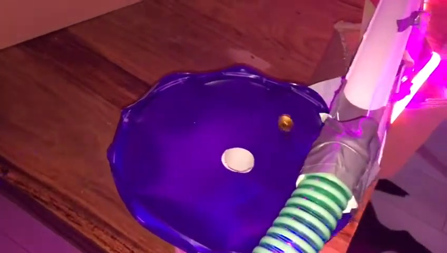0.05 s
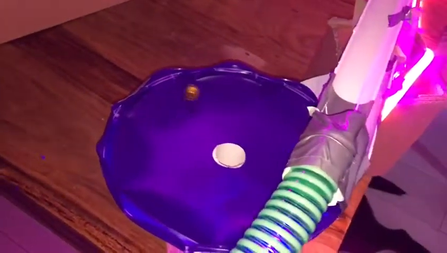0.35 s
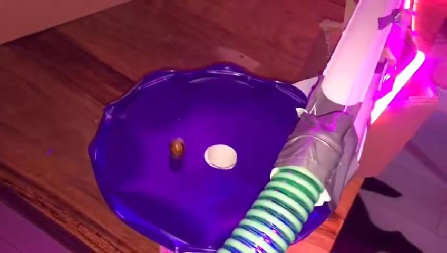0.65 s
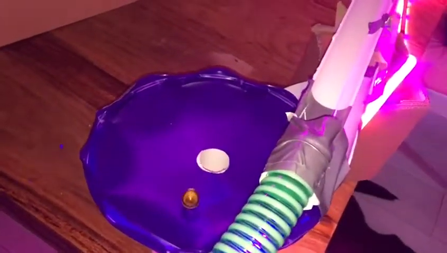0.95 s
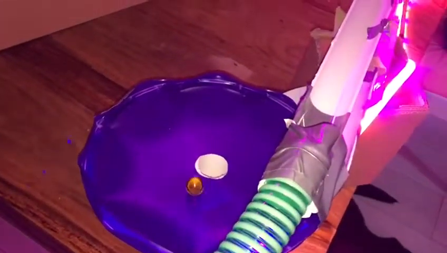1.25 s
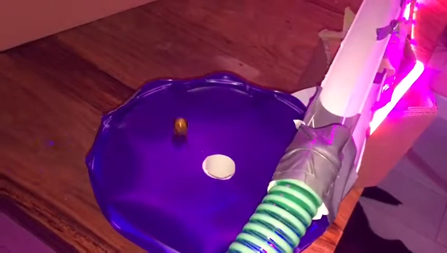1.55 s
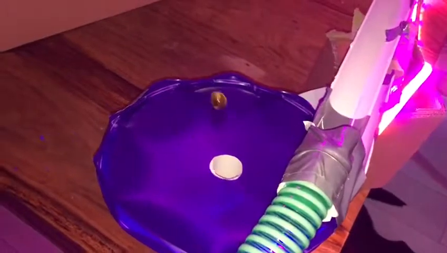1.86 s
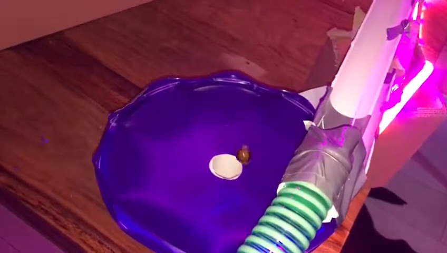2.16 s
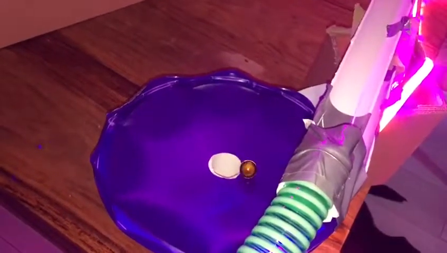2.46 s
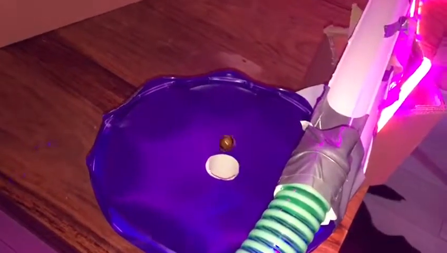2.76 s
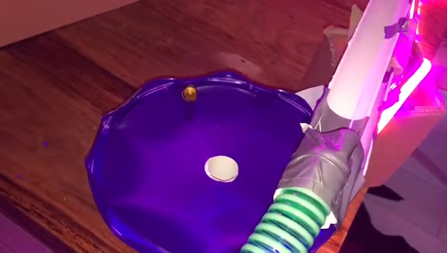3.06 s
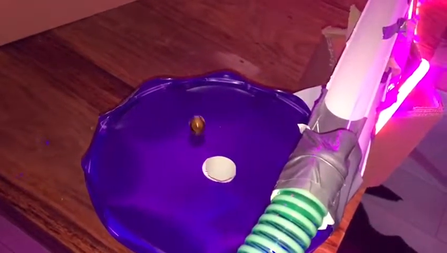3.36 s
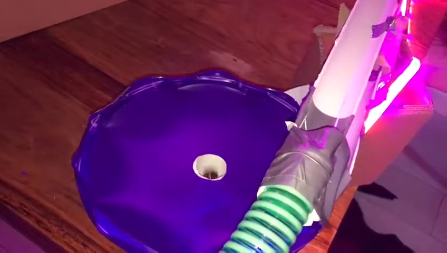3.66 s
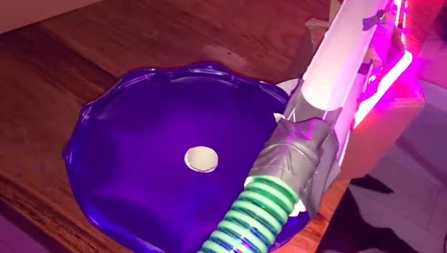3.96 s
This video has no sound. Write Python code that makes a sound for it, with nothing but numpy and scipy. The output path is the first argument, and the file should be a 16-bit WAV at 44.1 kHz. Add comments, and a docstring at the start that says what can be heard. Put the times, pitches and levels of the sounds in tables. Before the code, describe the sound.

A glass marble rolls around a plastic bowl with a soft, hollow rumble and small ticks. The rumble swells in the first second, again from about 1.4 to 2.2 seconds, and once more from 2.9 to 3.6, nearly silent in between. At about 3.8 seconds the marble drops onto a track with a loud, quick clatter, brief ringing and low thumps. The room is small and quiet.

```python
"""A glass marble rumbles through a shallow plastic bowl in three swings: tiny bumps shake the bowl's
resonances, flaws tick, and it is almost silent creeping past the central hole. Then it falls through,
clips the track below and clatters into it; the track rings and its support thumps.
A small, quiet room answers."""
import sys
import numpy as np
from scipy import signal
from scipy.fft import rfft, irfft, next_fast_len
from scipy.io import wavfile
from scipy.ndimage import map_coordinates

SR = 44100
rng = np.random.default_rng(int(sys.argv[2]) if len(sys.argv) > 2 else 0)


def to_wav(sig):
    """Store sig (one row per channel, or 1-D mono) as 16-bit WAV at the path in sys.argv[1].

    Samples outside -1..1 are clipped; the rate is SR.
    """
    pcm = np.clip(np.atleast_2d(sig), -1, 1) * 32767
    pcm = np.round(pcm).astype(np.int16)
    wavfile.write(sys.argv[1], SR, pcm.T)  # frames by channels


N = 176400

# bowl resonances in three bands: centre_hz, width_hz, gain_db
BOWL_LOW = [(175, 80, -4), (319, 105, -1), (701, 195, -3), (938, 297, -2.5)]
BOWL_MID = [(1065, 125, 1.5), (1450, 310, -2.5), (1910, 302, 0), (2276, 290, -2.5)]
BOWL_HIGH = [(3215, 300, 2.5), (3930, 530, 3.5), (4490, 490, -3), (5300, 800, -5.5), (7460, 2100, -14),
             (9750, 1600, -13)]


def amp(db):
    """Decibels to gain."""
    return 10 ** (np.asarray(db) / 20)


def unit(x):
    """Scale to rms 1."""
    return x / np.sqrt(np.mean(x ** 2) + 1e-20)


def along(points, hz):
    """Interpolate (hz, value) points on a log frequency axis."""
    knots_hz, values = np.transpose(points)
    return np.interp(np.log(hz + 1), np.log(knots_hz + 1), values)


def wobble(knots_per_s, size=N):
    """Smooth random curve."""
    return map_coordinates(rng.standard_normal(size), [np.arange(size) * knots_per_s / SR])


def filtered(x, response):
    """Apply a complex frequency response."""
    size = next_fast_len(len(x) + SR // 10)
    return irfft(rfft(x, size) * response(np.fft.rfftfreq(size, 1 / SR)), size)[:len(x)]


def noise(spectrum, size):
    """Noise coloured by (hz, gain_db) points."""
    return filtered(rng.standard_normal(size), lambda hz: amp(along(spectrum, hz)))


def resonate(x, peaks):
    """Parallel steep-sided resonances of alternating sign."""
    def response(hz):
        total = 0
        for k, (centre_hz, width_hz, gain_db) in enumerate(peaks):
            damping = 2j * hz * width_hz
            bandpass = damping / (centre_hz ** 2 - hz ** 2 + damping)
            total += (-1) ** k * amp(gain_db) * bandpass ** 2
        return total
    return filtered(x, response)


def add(out, start_s, sound):
    """Mix a sound in at start_s."""
    part = out[round(start_s * SR):][:len(sound)]
    part += sound[:len(part)]


def swell(t, rise_s):
    """Envelope peaking at 1 at rise_s, then dying quickly."""
    return t / rise_s * np.exp(1 - t / rise_s)


def partial(hz, t):
    """Sine with random phase."""
    return np.sin(2 * np.pi * (hz * t + rng.random()))


def ring(modes, t):
    """Sum of freely decaying modes."""
    return sum(amp(db - 60 * t / t60_s) * partial(hz, t) for hz, db, t60_s in modes)


def air():
    """Faint, steady room air, mostly bass."""
    # air spectrum: freq_hz, relative_db
    spectrum = [(15, -13), (28, 4), (50, 3.5), (100, -1), (200, -3), (320, -9.5), (600, -15.5),
                (1500, -23.5), (4000, -28.5), (9000, -31), (12000, -34.5)]
    return amp(-64.5) * unit(noise(spectrum, N))


def room(x, gap_s=0.004):
    """Reverberation: a noise tail, each frequency dying at its own rate."""
    # room decay: freq_hz, t60_s
    decay = [(150, 0.65), (1000, 0.22), (4000, 0.21), (11000, 0.29)]
    hz, t, bins = signal.stft(rng.standard_normal(SR // 2), SR, nperseg=256)
    t60_s = along(decay, hz)[:, None]
    _, tail = signal.istft(bins * amp(-60 * t / t60_s), SR, nperseg=256)
    delayed = np.pad(x, (round(gap_s * SR), 0))
    return signal.fftconvolve(delayed, tail / np.linalg.norm(tail))[:N]


def thump(t, rise_s=0.013):
    """Low, soft-edged shake of the support."""
    # support modes: pitch_hz, level_db, t60_s
    modes = [(118, -1.5, 0.21), (153.7, -2, 0.32), (201, 1, 0.18), (249, -0.5, 0.18), (315, -2.5, 0.19)]
    return ring(modes, t) * (1 - np.exp(-(t / rise_s) ** 2))


def lip(start_s=3.708):
    """The marble tips over the edge of the hole; the unloaded bowl rocks softly."""
    out = np.zeros(N)
    add(out, start_s, amp(-51.5) * thump(np.arange(SR // 2) / SR))
    return out


def singing(width_hz=340):
    """Over a lively spot, one narrow bowl resonance swells and glides with the marble's position."""
    # lively spots: centre_s, half_length_s, pitch_hz, glide_oct_per_s, level_db
    spots = [(.19, 0.053, 854, -1.5, -55.5), (0.337, 0.013, 805, 1, -48), (.36, .04, 1482, -1.5, -54.5),
             (.395, 0.051, 928.4, -3.5, -48), (.44, .025, 451, -3.5, -51.5), (0.606, .012, 947, 0.5, -47.5),
             (.645, .04, 820, -5.5, -49), (.66, 0.037, 329, -4, -54.5), (.74, 0.026, 1858, 1.5, -57.5),
             (1.612, 0.02, 1450, 0.5, -59.5), (1.755, 0.027, 831, 2, -55), (1.864, 0.019, 841, 3, -46.5),
             (2.0, 0.033, 2146, -1.5, -62), (2.01, 0.038, 908, -1.5, -52), (2.02, 0.034, 1450, -2, -59),
             (2.95, 0.029, 1335, 3.5, -60.5), (3.012, 0.014, 2000, 2, -56.5),
             (3.13, 0.023, 798, -3.5, -45.5), (3.345, 0.058, 778.4, -2.5, -51.5),
             (3.405, .018, 400, -8.5, -54.5), (3.478, 0.019, 1960, 1, -53)]
    out, t = np.zeros(N), np.arange(-SR // 6, SR // 6) / SR
    for centre_s, half_length_s, pitch_hz, glide_oct_per_s, level_db in spots:
        phase = 2 * np.pi * pitch_hz * t * 2 ** (glide_oct_per_s * t / 2)
        band = wobble(width_hz, len(t)) * np.cos(phase) + wobble(width_hz, len(t)) * np.sin(phase)
        envelope = np.exp(-(t / half_length_s) ** 2)
        add(out, centre_s + t[0], amp(level_db) * envelope * band)
    return out


def strike(force, peaks):
    """Bowl response to a contact force, scaled to peak 1."""
    response = resonate(force, peaks)
    return response / np.abs(response).max()


def ticks(thud_hz=863, body_db=-8.5, scrape_db=-13.5):
    """Each flaw gives a dull thud; its tap and brief scrape excite a ring and a hard edge."""
    # flaws under the marble: start_s, thud_db, ring_db, edge_db
    flaws = [(.157, -41.5, -71, -71), (.256, -35, -40, -48), (0.333, -36.5, -40.5, -49.5),
             (.371, -35, -42, -55), (.377, -39, -46, -54.5), (.450, -34.5, -45.5, -50),
             (.500, -55, -60, -55.5), (.614, -30, -40, -48), (.620, -42, -52, -62), (.641, -37.5, -65, -56),
             (.915, -44.5, -44.5, -55.5), (1.383, -51.5, -48.5, -59), (1.451, -52, -50.5, -60),
             (1.517, -41.5, -42.5, -50.5), (1.572, -46, -57, -69), (1.598, -42, -44, -55),
             (1.68, -42, -41.5, -44.5), (1.727, -41.5, -58, -63), (1.857, -35.5, -51, -68),
             (1.867, -36.5, -52, -76), (1.911, -61, -55, -53), (2.065, -48, -39.5, -43),
             (2.085, -33, -32.5, -44), (2.0947, -36, -40, -43), (2.111, -47, -44, -55),
             (2.937, -49.5, -49, -59), (3.015, -47, -39, -52), (3.021, -48, -49, -57),
             (3.114, -27.5, -51, -55.5), (3.121, -36, -49, -65), (3.129, -33.5, -50, -50),
             (3.147, -37, -46, -61), (3.228, -31, -45, -51), (3.310, -37.5, -60, -71),
             (3.349, -41.5, -59, -66), (3.466, -50, -45, -57), (3.487, -48, -47.5, -59),
             (3.514, -50, -46.5, -60.5)]
    out, t = np.zeros(N), np.arange(SR // 20) / SR
    tap = 1. * (t == 0)
    pulse = swell(t, rise_s=0.00079) * np.sin(2 * np.pi * thud_hz * t)
    thud = pulse + amp(body_db) * strike(tap, BOWL_LOW)
    for start_s, thud_db, ring_db, edge_db in flaws:
        contact = tap + amp(scrape_db) * swell(t, rise_s=0.00091) * rng.standard_normal(len(t))
        ringing = amp(ring_db) * strike(contact, BOWL_MID)
        edge = amp(edge_db) * strike(contact, BOWL_HIGH)
        add(out, start_s, amp(thud_db) * thud + ringing + edge)
    return out


def rolling():
    """Tiny bumps shake the bowl; swinging out raises the rumble's pitch and shortens the rim echo."""
    # rolling envelopes: time_s, rumble_db, ring_db
    levels = [(0.0, -62, -72.5), (0.16, -60, -73.5), (0.32, -51, -65), (0.41, -56, -66.5),
              (0.57, -64.5, -65.5), (0.69, -55, -63), (0.81, -61, -67), (0.88, -66.5, -69),
              (0.97, -60.5, -70), (1.03, -82, -83.5), (1.28, -77.5, -82), (1.39, -68.5, -69.5),
              (1.54, -63, -71.5), (1.65, -59, -61), (1.74, -61.5, -67), (1.98, -61.5, -68.5),
              (2.07, -58, -60), (2.27, -70, -74.5), (2.47, -90, -87), (2.74, -84, -85), (2.88, -68.5, -71),
              (3.02, -57, -63.5), (3.15, -59.5, -79), (3.25, -72, -85), (3.43, -58.5, -69),
              (3.62, -70.5, -74), (3.7, -75, -84)]
    # marble path: time_s, radius (0 hole, 1 rim)
    swing = [(0, .5), (.47, 1), (1.15, .1), (1.78, 1), (2.3, 0), (2.7, 0), (3.17, 1), (3.7, 0)]
    bumps_per_s, scatter_db = 4000, 3.5
    rumble_boost_db, grit_db, glide_oct = 2, -11.5, 0.6
    n = np.arange(N)
    time_s, *curves_db = np.transpose(levels)
    rumble_db, ring_db = [np.interp(n / SR, time_s, curve) for curve in curves_db]
    radius = np.interp(n / SR, *np.transpose(swing))
    bumps = (rng.random(N) < bumps_per_s / SR) * rng.standard_normal(N)
    bumps *= amp(scatter_db * rng.standard_normal(N))
    bumps *= amp(2 * wobble(knots_per_s=47))  # uneven contact pressure
    echo_ms = 2.2 + 1.6 * (1 - radius)
    bumps += 0.24 * np.interp(n - echo_ms * SR / 1000, n, bumps)
    low, mid, high = [unit(resonate(bumps, peaks)) for peaks in (BOWL_LOW, BOWL_MID, BOWL_HIGH)]
    pitch_ratio = 2 ** (glide_oct * (radius - 0.8))
    rumble = np.interp(np.cumsum(pitch_ratio), n, low)
    return amp(rumble_db + rumble_boost_db) * rumble + amp(ring_db) * (mid + amp(grit_db) * high)


def clatter(detune=0.009, pivot_hz=2640):
    """Each blow on the track gives a clack and a crack, rings the track and thumps its support."""
    # blows: start_s, gain_db, treble_tilt_db_per_oct, thump_gain_db
    blows = [(3.8168, -19.5, -1, 0), (3.8776, 0.5, -0.5, 1), (3.8979, -10.5, 3, 7),
             (3.9005, -12, -3.5, -15), (3.9492, -16, -2.5, -15), (3.9781, -12, -5, 8),
             (3.993, -25.5, -7, 0)]
    # damped track modes: pitch_hz, level_db
    clack_modes = [(720, -19), (1300, -5), (1660, 0), (1980, 0), (2570, -5.5), (3280, 0), (3800, -8.5),
                   (4380, -3.5), (4880, -9), (5350, -8.5), (6400, -9.5), (6850, -4), (7150, -8.5),
                   (8500, -10.5), (9300, -12), (11100, -17)]
    # crack spectrum: freq_hz, gain_db
    crack_spectrum = [(40, -15), (200, -1.5), (700, -2.5), (1800, 1.5), (4000, 2.5), (6800, 1.5),
                      (11500, -7)]
    # lasting track modes: pitch_hz, level_db, t60_s
    track_modes = [(1205, -6, .6), (1248, -5, .6), (1318, -8, .6), (1358, -10, .6), (1718, -1, .4),
                   (1815, 1, .22), (2022, -1, .35), (2115, -3, .4), (3352, -5, .28), (3400, -5, .28),
                   (4435, -4, .28), (4484, -6, .28), (6456, -9, .25), (7174, -6, .25)]
    out, t = np.zeros(N), np.arange(SR // 4) / SR
    for start_s, gain_db, tilt_db_per_oct, thump_gain_db in blows:
        # each blow lands on another spot, detuning the clack
        tones = sum(amp(db) * partial(hz * (1 + detune * rng.standard_normal()), t)
                    for hz, db in clack_modes)
        clack = amp(-5.5) * swell(t, rise_s=0.00095) * unit(tones)
        crack = amp(-11) * swell(t, rise_s=0.0018) * noise(crack_spectrum, len(t))
        hit = clack + crack + amp(-31) * ring(track_modes, t)
        hit = filtered(hit, lambda hz: amp(tilt_db_per_oct * np.log2(np.maximum(hz / pivot_hz, 0.5))))
        support = amp(thump_gain_db - 33) * thump(t)
        add(out, start_s, amp(gain_db) * (hit + support))
    return out


def scene(bowl_wet_db=-6, track_wet_db=-7):
    """Bowl and track in the room, over faint air; mono."""
    bowl = rolling() + singing() + ticks() + lip()
    track = clatter()
    mix = air() + bowl + track + amp(bowl_wet_db) * room(bowl) + amp(track_wet_db) * room(track)
    return mix[None]


def record(dry, low_cut_hz=56, top_hz=11700):
    """Soft peak limit, bass cut and steep band limit."""
    x = dry[0] / (1 + dry[0] ** 6) ** (1 / 6)
    x = filtered(x, lambda hz: (1j * hz / (low_cut_hz + 1j * hz)) ** 2)
    return filtered(x, lambda hz: 1 / np.sqrt(1 + (hz / top_hz) ** 200))[None]


dry = scene()
out = record(dry)
to_wav(out)
```